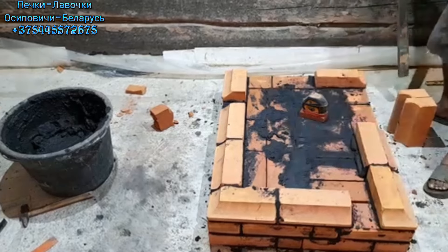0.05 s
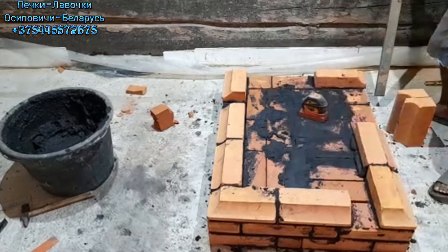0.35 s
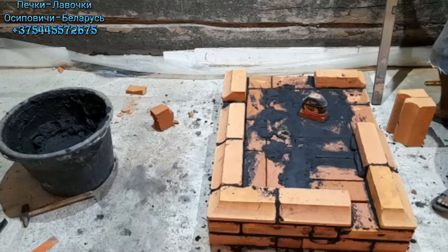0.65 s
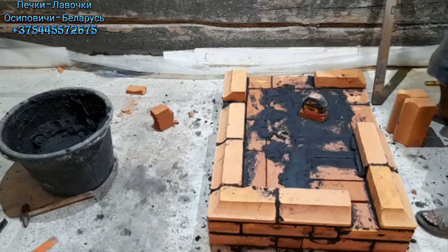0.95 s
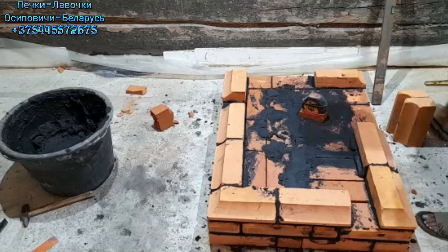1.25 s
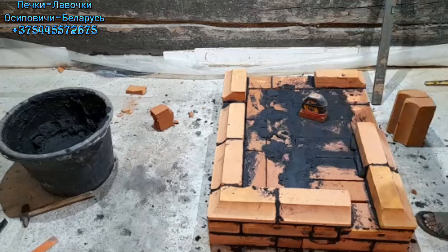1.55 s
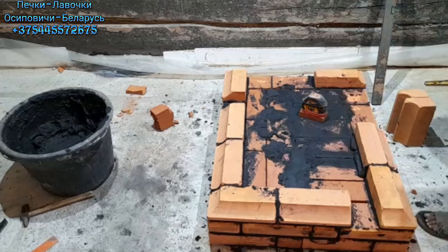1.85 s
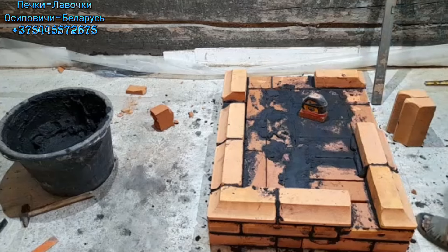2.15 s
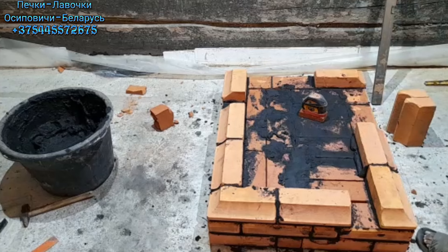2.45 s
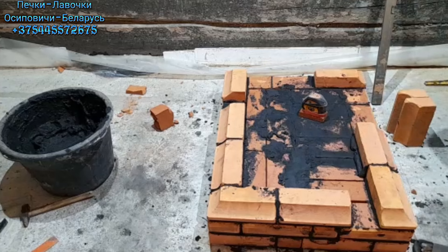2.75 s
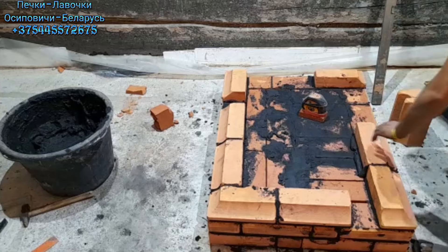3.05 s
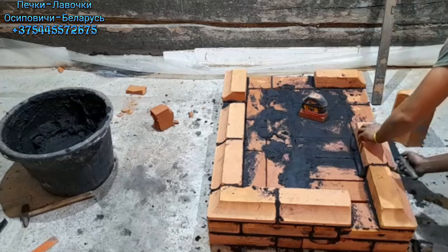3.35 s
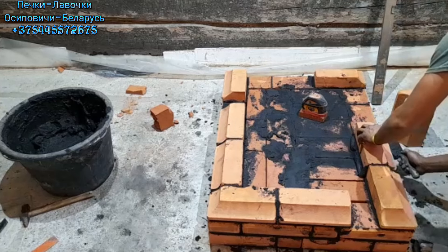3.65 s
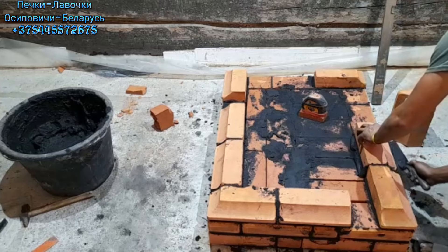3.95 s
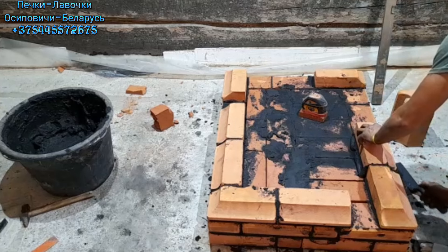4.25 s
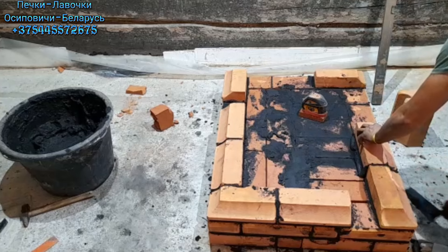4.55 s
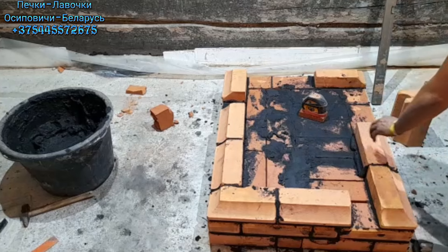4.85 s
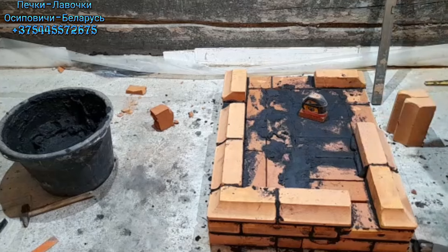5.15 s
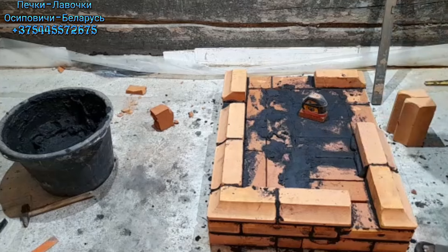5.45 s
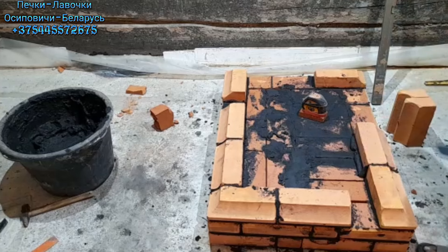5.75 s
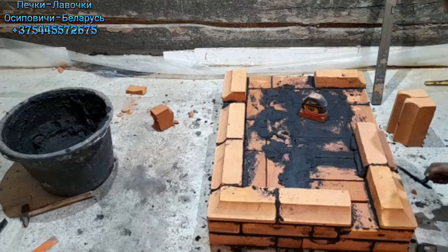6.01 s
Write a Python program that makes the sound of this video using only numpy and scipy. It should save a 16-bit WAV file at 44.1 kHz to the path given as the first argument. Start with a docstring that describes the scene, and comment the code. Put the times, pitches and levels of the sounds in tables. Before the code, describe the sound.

A steel bar clacks and rings briefly as it is leaned against a timber wall. Rubber soles shuffle over grit, and a heavy step thumps and grinds on the floorboards. A trowel then catches and judders on brick with a brief low groan, and sweeps along it, hissing through wet sandy mortar. One lighter step follows. The sounds come from a few metres away, slightly right, in a quiet wooden room with short reverberation.

```python
"""Bricklaying at a stove

A log room with a gritty board floor. The bricklayer is a few metres off, right of a spaced microphone
pair, so the room is as loud as the direct sound. He leans a steel straightedge on the wall, shuffles,
steps down heavily, draws a trowel along the bricks to cut off wet clay mortar, and steps back."""
import sys
import numpy as np
from scipy import signal
from scipy.fft import rfft, irfft, next_fast_len
from scipy.io import wavfile

SR = 44100
rng = np.random.default_rng(int(sys.argv[2]) if len(sys.argv) > 2 else 0)


def wrap_up_sound(samples):
    """Save the sound to the file named by the first command line argument, as 16-bit audio."""
    columns = np.atleast_2d(samples).T
    # keep every value between -1 and 1, then stretch to whole-number steps
    tamed = np.clip(columns, -1, 1)
    steps = np.round(tamed * 32767).astype(np.int16)
    wavfile.write(sys.argv[1], SR, steps)


N = 272535
TIME = np.arange(N) / SR
SIZE = 2 * next_fast_len((N + SR) // 2)
HZ = np.fft.rfftfreq(SIZE, 1 / SR)
TOP_HZ = 15600
HIT_SAMPLES = SR // 20  # a hit's level is its energy spread over this many samples

# room tone at the microphones: (frequency [Hz], level [dB])
ROOM_TONE = [(25, -28.5), (60, -12.5), (110, -8), (200, -10.5), (400, -18), (520, -16), (700, -19.5),
             (1500, -26), (4000, -27), (7000, -25.5), (8500, -31), (10000, -22), (12000, -27), (15500, -26)]
# soles slide over grit: (start [s], length [s], rise [s], level [dB], low cut [Hz])
SCUFFS = [(.005, 0.038, 0.019, -49.5, 4860), (.299, .012, .004, -53.5, 5530),
          (1.031, 0.13, 0.0093, -56.5, 1710), (1.156, .02, .003, -40, 2400),
          (1.177, .02, .018, -24.5, 2300), (1.459, 0.3, 0.15, -46.5, 756),
          (1.959, 0.18, 0.0074, -33.5, 1640), (2.302, 0.051, 0.016, -36.5, 2050),
          (2.415, 0.06, .02, -51.5, 2000), (2.476, 0.13, 0.0025, -29.5, 700),
          (2.664, 0.042, .006, -32, 865), (3.035, 0.17, .06, -65.5, 4900), (5.24, 0.12, .07, -46, 4600),
          (5.308, 0.02, .003, -28.5, 1530), (5.474, 0.021, 0.0067, -50, 2390),
          (5.516, 0.014, 0.0089, -40, 2140), (5.621, 0.062, .008, -60.5, 2600),
          (5.731, .03, 0.023, -59.5, 4000)]
# grit under a sole: (frequency [Hz], level [dB])
GRIT_SPECTRUM = [(200, 5.5), (1000, 6), (2000, -2), (3500, 1), (5200, -1.5), (6700, -1), (8500, -4.5),
                 (10000, 0.5), (14500, -3)]
# bare rubber drags on the boards: (start [s], length [s], rise [s], level [dB])
DRAGS = [(1.177, .02, 0.017, -56), (1.472, 0.044, .001, -45.5), (1.524, 0.097, .01, -64),
         (1.737, 0.042, 0.041, -46.5), (1.966, .13, .004, -52)]
# its dull rub: (frequency [Hz], level [dB])
RUBBER_SPECTRUM = [(100, -7), (350, -4.5), (600, -2), (1100, 1), (1700, -5), (3000, -16), (8000, -46.5)]
# single crumbs crack: (time [s], level [dB])
CRACKS = [(.0635, -49), (0.168, -57.5), (0.303, -58), (0.899, -60), (1.9665, -51), (2.304, -47),
          (3.3716, -45.5), (3.644, -47.5), (3.7004, -46), (5.312, -37.5)]
# a cracking crumb: (frequency [Hz], level [dB])
CRUMB_SPECTRUM = [(1000, 5.5), (4000, -3.5), (6700, 2.5), (8500, -0.5), (10500, 3), (15000, -3.5)]
# the straightedge meets floor and wall: (time [s], ring [dB], knock [dB])
LEANING = [(0.432, -45, -48.5), (.447, -55.5, -41.5), (.641, -44.5, -31.5), (.662, -49, -31)]
# its ringing modes: (frequency [Hz], level [dB])
STEEL_MODES = [(1550, -0.5), (2090, 1.5), (2229, 0), (2466, 2), (2780, 1.5), (3128, -3.5), (4050, -5),
               (4307, 0), (5523, -7)]
# its clack on contact: (frequency [Hz], level [dB])
CLACK_SPECTRUM = [(200, -16), (900, 3), (1350, -46), (1800, 1), (2500, 1), (4500, -3.5), (8000, -9.5),
                  (15000, -13)]
# the log wall's knock: (frequency [Hz], level [dB])
WALL_SPECTRUM = [(50, -25), (100, -17.5), (150, -5), (200, -2.5), (280, 0.5), (480, -3.5), (690, -1.5),
                 (1000, -13), (2000, -23), (8000, -50.5)]
# weight lands on the boards, cushioned by the sole: (time [s], level [dB], high cut [Hz])
FOOTFALLS = [(1.04, -45, 260), (2.4818, -24, 900), (2.494, -17.5, 1170), (2.5273, -25.5, 700),
             (2.5456, -22.5, 1000), (5.316, -30, 320)]
# a footfall's thud: (frequency [Hz], level [dB])
THUD_SPECTRUM = [(30, -31.5), (70, -31), (120, -11.5), (200, -6), (450, -5.5), (560, -5), (665, 3.5),
                 (830, -4.5), (1050, -7), (1500, -6), (2300, -13.5), (8000, -47.5)]
# modes of the floor: (frequency [Hz], level [dB])
FLOOR_MODES = [(118, -5.5), (132, -6.5), (166, 4), (270, -1), (345, -9.5), (408, -6), (464, -2.5),
               (484, -4), (556, -9), (658, 6), (735, 5), (785, -8.5)]
# boards grind under a loaded sole: (start [s], length [s], rise [s], level [dB])
GRINDS = [(2.554, 0.076, .002, -27.5), (2.66, .06, .002, -33)]
# the grinding wood: (frequency [Hz], level [dB])
GRIND_SPECTRUM = [(47, -42), (80, -19.5), (229, -11), (276, -12.5), (343, 1.5), (431, -19), (551, -4),
                  (646, 1.5), (837, -8), (966, -8.5), (1150, -12.5), (2070, -15), (2500, -26), (3250, -73),
                  (5500, -120)]
# the blade catches on an edge; pressed harder it rings lower:
# (start [s], length [s], level [dB], pitch [Hz], ring of the free blade [dB])
CATCHES = [(3.37, 0.0503, -40.5, 844, -48), (3.445, .03, -33.5, 900, -59.5), (3.497, .012, -42, 880, -64.5),
           (3.569, 0.024, -34, 785, -52.5), (3.592, 0.028, -29.5, 797, -36.5), (3.628, .012, -33, 788, -50),
           (3.728, .035, -33.5, 754, -48.5)]
# the blade pressed on brick: (frequency [Hz], width [Hz], level [dB])
JUDDER_MODES = [(590, 34, -2), (916, 20, -7.5), (1110, 45, -9), (1227, 55, -10), (1390, 66, -14),
                (1610, 35, -9), (1775, 37, -8.5)]
# the brick under the blade: (frequency [Hz], level [dB])
BRICK_SPECTRUM = [(150, -22.5), (240, -21), (300, -10), (430, -9.5), (620, -0.5), (800, 1.5), (980, -2.5),
                  (1150, -3), (1600, -10.5), (3000, -36.5)]
# the free blade, damped by clay: (frequency [Hz], width [Hz], level [dB])
BLADE_MODES = [(1430, 193, 4.5), (1900, 300, -7.5), (2460, 250, 6.5), (3150, 226, -10), (3794, 380, 4),
               (4540, 130, -10), (5570, 200, -12)]
# sand in the mortar: (frequency [Hz], level [dB])
SAND_SPECTRUM = [(500, -26.5), (1200, 9), (2000, 4.5), (4000, 4), (6500, -0.5), (8500, -4), (10200, 3.5),
                 (14500, -1.5)]
# the long stroke along the bricks: (time [s], effort [dB])
STROKE = [(3.65, -39), (3.672, -43.5), (3.904, -42.5), (4.046, -30.5), (4.078, -36), (4.132, -35.5),
          (4.274, -23.5), (4.348, -28.5), (4.446, -26), (4.468, -32.5), (4.5, -32.5)]
# reverberation of the log room: (frequency [Hz], time to fall 60 dB [s])
ROOM_T60 = [(130, 0.39), (400, 0.3), (1000, 0.34), (3000, 0.32), (7000, 0.31), (14000, 0.25)]


def amp(db):
    """Decibels to amplitude."""
    return 10 ** (np.asarray(db) / 20)


def unit(x):
    """x scaled to rms 1."""
    return x / np.sqrt(np.mean(np.abs(x) ** 2) + 1e-20)


def along(points, hz):
    """Interpolate (Hz, value) points on a log axis."""
    f, v = np.transpose(points)
    return np.interp(np.log(hz + 1), np.log(f + 1), v)


def filtered(x, response):
    """x through a frequency response."""
    return irfft(rfft(x, SIZE) * response, SIZE)[..., :N]


def colour(points):
    """Causal response of unit power through (Hz, dB) points."""
    cepstrum = irfft(np.log(amp(along(points, HZ))))
    cepstrum[1:SIZE // 2] *= 2
    cepstrum[SIZE // 2 + 1:] = 0
    return unit(np.exp(rfft(cepstrum)) * (HZ < TOP_HZ))


def resonances(peaks):
    """Unit-power response of (Hz, width Hz, dB) resonances."""
    return unit(sum(amp(db) * 1j * HZ * width / (hz * hz - HZ * HZ + 1j * HZ * width)
                    for hz, width, db in peaks))


def ringing(modes, t60_s):
    """Unit-power response of struck (Hz, dB) modes dying away."""
    t = TIME[:SR]
    ring = sum(amp(db) * np.sin(2 * np.pi * (hz * t + rng.random())) for hz, db in modes)
    attack = 1 - np.exp(-t / .004)
    return unit(rfft(ring * amp(-60 * t / t60_s) * attack, SIZE))


def pass_filter(x, hz, kind, order=2):
    """High-pass or low-pass."""
    return signal.sosfilt(signal.butter(order, min(hz, TOP_HZ), kind, fs=SR, output="sos"), x)


def blows(rows):
    """One impulse for each (s, dB) row."""
    x = np.full(N, 1e-20)  # keeps filter tails from underflowing
    for s, db in rows:
        x[round(s * SR)] += amp(db) * np.sqrt(HIT_SAMPLES)
    return x


def wobble(rate):
    """A smooth random curve, rate knots a second."""
    return signal.resample(rng.standard_normal(int(SIZE * rate / SR) + 2), SIZE)[:N]


def shares(rate, count):
    """Gliding random weights whose powers add up to one."""
    weights = np.array([wobble(rate) for _ in range(count)])
    return weights / np.linalg.norm(weights, axis=0)


def grains(rate, spread_db):
    """Tiny fractures at random times and of uneven size, rms 1."""
    clicks = (rng.random(N) < rate / SR) * rng.choice([-1, 1], N)
    return unit(clicks * amp(spread_db * np.clip(rng.standard_normal(N), -3, 3)))


def slide(start_s, length_s, rise_s, db, swell_db=11, lift_db_per_s=649):
    """Gain of a sliding contact: it swells as weight comes on, holds, and fades as it lifts."""
    t = TIME - start_s
    swell = np.clip(t / max(rise_s, 1 / SR), 0, 1) - 1
    lift_db = np.minimum(lift_db_per_s * np.maximum(t - length_s, 0), 200)
    return (t >= 0) * amp(db + swell_db * swell - lift_db)


def fading(start_s, db, db_per_s):
    """Gain that jumps up and dies away."""
    return (TIME >= start_s) * amp(db - db_per_s * np.clip(TIME - start_s, 0, 1))


def diffuse(pair, spacing_m=0.21):
    """Sound from all sides: alike at both microphones in the bass only."""
    alike = np.sinc(2 * np.fft.rfftfreq(pair.shape[1], 1 / SR) * spacing_m / 343)
    mid, side = irfft(rfft(pair) * np.sqrt([(1 + alike) / 2, (1 - alike) / 2]), pair.shape[1])
    return np.array([mid + side, mid - side])


def room_tone(drone_hz=48, width_hz=18, swell_at_s=4.37, rise_s=.5):
    """Faint noise all round the microphones, and a low drone that swells late."""
    air = unit(filtered(diffuse(rng.standard_normal((2, SIZE))), amp(along(ROOM_TONE, HZ))))
    drone = unit(filtered(rng.standard_normal(N), resonances([(drone_hz, width_hz, 0)]) ** 2))
    swell = np.clip((TIME - swell_at_s) / rise_s, 0, 1)
    return amp(-62.5) * air + amp(-79 + 9 * swell) * drone


def soles():
    """Grit crushed under sliding soles, higher for a light touch; bare rubber rubs lower."""
    grit = grains(rate=7000, spread_db=8.5)
    scuffs = sum(pass_filter(grit * slide(*stroke), hz, "high", order=3) for *stroke, hz in SCUFFS)
    rasp = filtered(pass_filter(scuffs, 12970, "low", order=1), amp(4.5) * colour(GRIT_SPECTRUM))
    rub = grains(rate=1000, spread_db=1.5) * sum(slide(*row) for row in DRAGS)
    return rasp + filtered(rub, colour(RUBBER_SPECTRUM))


def crumbs(t60_s=0.011, middling_db=-49.5, middling_hz=3600, db_per_octave=19):
    """Single crumbs of brick crack for a few milliseconds, the small ones higher."""
    t = TIME[:HIT_SAMPLES]
    cracks = np.zeros(N)
    for s, db in CRACKS:
        burst = unit(rng.standard_normal(len(t)) * amp(-60 * t / t60_s))
        low_cut_hz = middling_hz * 2 ** ((middling_db - db) / db_per_octave)
        cracks[round(s * SR):][:len(t)] += amp(db) * pass_filter(burst, low_cut_hz, "high")
    return filtered(cracks, amp(-1.5) * colour(CRUMB_SPECTRUM))


def straightedge():
    """The steel bar clacks and rings; the timber behind it knocks."""
    on_steel = blows([(s, db) for s, db, _ in LEANING])
    on_timber = blows([(s, db) for s, _, db in LEANING])
    steel = amp(-0.5) * ringing(STEEL_MODES, t60_s=.11) + amp(2.5) * colour(CLACK_SPECTRUM)
    return filtered(on_steel, steel) + filtered(on_timber, amp(-2.5) * colour(WALL_SPECTRUM))


def floorboards(heavy_db=-21, heavy_hz=80, db_per_octave=13):
    """Footfalls thump the boards and a turning sole grinds them; both set the whole floor booming."""
    force = 0
    for s, db, high_cut_hz in FOOTFALLS:
        low_cut_hz = heavy_hz * 2 ** ((heavy_db - db) / db_per_octave)  # heavier steps reach deeper
        step = pass_filter(blows([(s, db)]), low_cut_hz, "high", order=3)
        force += pass_filter(step, high_cut_hz, "low")
    slips = grains(rate=500, spread_db=4) * sum(slide(*row) for row in GRINDS)
    thuds = filtered(force, amp(1) * colour(THUD_SPECTRUM))
    grinding = filtered(slips, amp(-2) * colour(GRIND_SPECTRUM))
    boom = filtered(amp(-2.5) * force + amp(-11) * slips, ringing(FLOOR_MODES, t60_s=.42))
    return thuds + grinding, boom


def blade_catches(slips, width_hz=18, peak_db=7.5):
    """The blade sticks and slips on brick: its judder, and the gain of its ring after each catch."""
    judder = ring = 0
    for start_s, length_s, db, hz, ring_db in CATCHES:
        force = amp(-2) * slips * slide(start_s, length_s, 0, db) + blows([(start_s, db + .5)])
        body = resonances(JUDDER_MODES + [(hz, width_hz, peak_db)])
        judder += filtered(force, amp(-2.5) * body + amp(-8) * colour(BRICK_SPECTRUM))
        ring += fading(start_s, ring_db, db_per_s=290.5)
    return judder, ring


def free_blade(chatter, shift=0.031):
    """Chatter rings the blade; its resonances wander as the point of contact moves."""
    blade = 0
    for k, share in zip((-1, 0, 1), shares(rate=22, count=3)):
        modes = [(hz * (1 + k * shift), width, db) for hz, width, db in BLADE_MODES]
        blade += filtered(chatter * share, resonances(modes))
    return blade


def trowel(bite_s=3.368, lead_s=0.018, firm_db=-30.5):
    """The blade bites in and catches, then sweeps along the brick, hissing in the sandy mortar."""
    s, effort_db = np.transpose(STROKE)
    # the push leads, as the room takes a moment to fill
    push = amp(np.interp(TIME + lead_s, s, effort_db - firm_db, left=-200, right=-200))
    slips = grains(rate=600, spread_db=4.5)
    judder, ring = blade_catches(slips)
    brick = filtered(slips * amp(-31) * push ** 0.82, colour(BRICK_SPECTRUM))
    grip = amp(2.5 * wobble(70))  # the edge grips and lets go on the rough face
    sweep = amp(-36.5) * push
    blade = free_blade(grains(rate=800, spread_db=1.5) * (sweep + amp(-5.5) * ring) * grip)
    cutting = sweep + fading(bite_s, -37.5, db_per_s=339) + amp(-19.5) * ring
    sand = filtered(grains(rate=3000, spread_db=7) * cutting * grip, amp(5) * colour(SAND_SPECTRUM))
    return pass_filter(judder + brick + blade + sand, 157.5, "high")  # a small blade radiates no bass


def blade_groan(pitch_hz=274, waver=0.024, bend_s=3.44, full_bend_s=3.74, free_s=3.83):
    """The blade's lowest bending mode hums while it drags, louder the more it bends."""
    phase = 2 * np.pi * np.cumsum(pitch_hz * (1 + waver * wobble(33))) / SR
    bend_db = np.minimum(54 * (TIME - full_bend_s), 106 * (full_bend_s - TIME))  # rise, fall in dB/s
    contact = np.clip(np.minimum(TIME - bend_s, free_s - TIME) / 0.018, 0, 1)
    return np.sqrt(2) * np.sin(phase) * contact * amp(-37.5 + bend_db + 2 * wobble(35))


def direct(x, lag_ms=.2):
    """The straight path reaches the right microphone first."""
    return filtered(x, np.exp(-2j * np.pi * HZ * np.array([[lag_ms / 1000], [0]])))


def reflections(build_s=0.0047):
    """The log room's stereo tail, of unit energy: it builds up, then dies away, the treble first."""
    hz, t, noise = signal.stft(rng.standard_normal((2, SR * 2 // 3)), SR, nperseg=256)
    decay = amp(-60 * t / along(ROOM_T60, hz)[:, None])
    build = 1 - np.exp(-t / build_s)
    tail = diffuse(signal.istft(noise * decay * build, SR, nperseg=256)[1])
    return unit(tail) / np.sqrt(tail.shape[1])


def room(x, split_hz=1200, patterns=6):
    """As the contact moves, the sound glides between patterns of reflections, short waves faster."""
    low = filtered(x, 1 / (1 + (HZ / split_hz) ** 8))
    sends = low * shares(8, patterns) + (x - low) * shares(100, patterns)
    return sum(signal.oaconvolve(send[None], reflections(), axes=1)[:, :N] for send in sends)


def scene():
    """The stove hides floor and wall from the microphones, so less of their sound comes straight."""
    bar = straightedge()
    thumps, boom = floorboards()
    rasp, cracks, scrape = soles(), crumbs(), trowel()
    contacts = amp(-16) * bar + amp(-7.5) * thumps + amp(-7) * rasp + cracks + amp(-7) * scrape
    straight = direct(contacts + boom + blade_groan())
    reflected = room(bar + thumps + rasp + cracks + scrape)
    # (frequency [Hz], right microphone over left [dB])
    right_db = along([(150, 4.5), (600, .9), (3000, 2.5), (8000, 1.5), (14000, -1.5)], HZ)
    balance = amp(np.array([-right_db, right_db]) / 2)
    return filtered(straight + reflected, balance) + room_tone()


def record(dry):
    """The recorder keeps nothing above its band limit."""
    return filtered(dry, HZ < TOP_HZ)


dry = scene()
out = record(dry)
wrap_up_sound(out)
```